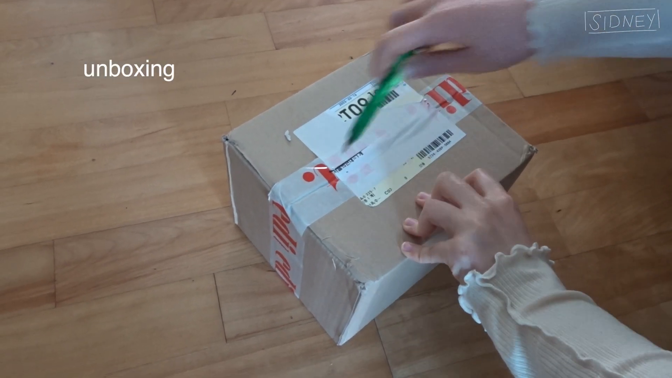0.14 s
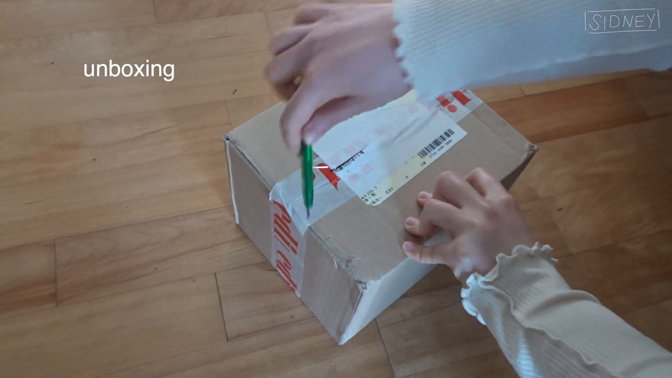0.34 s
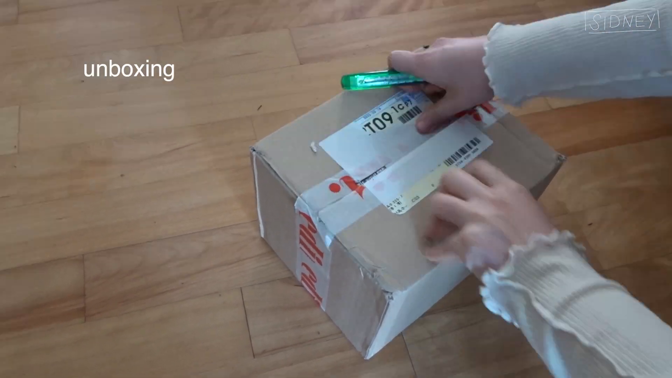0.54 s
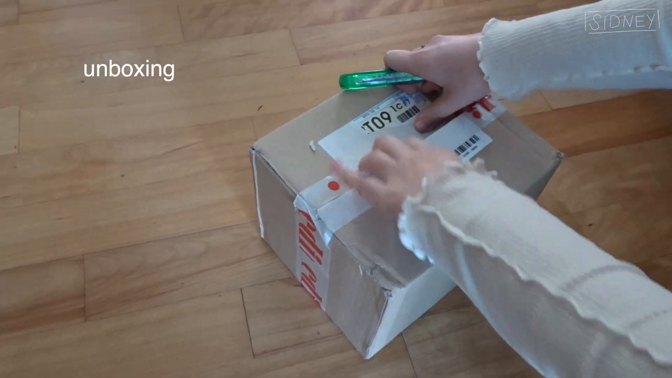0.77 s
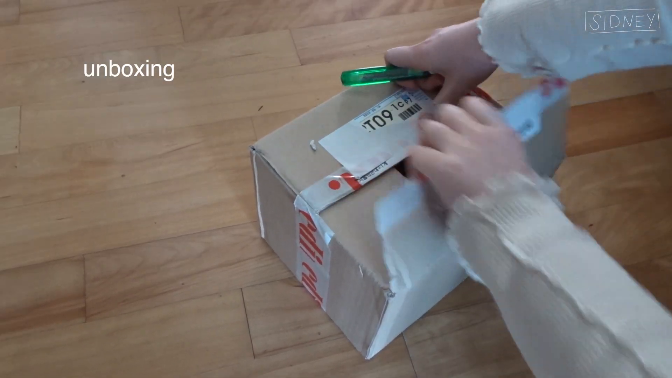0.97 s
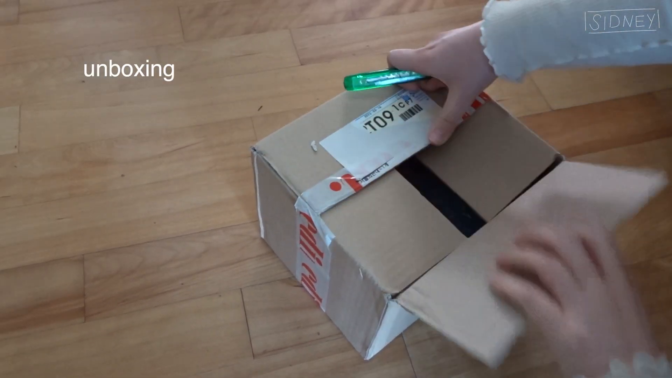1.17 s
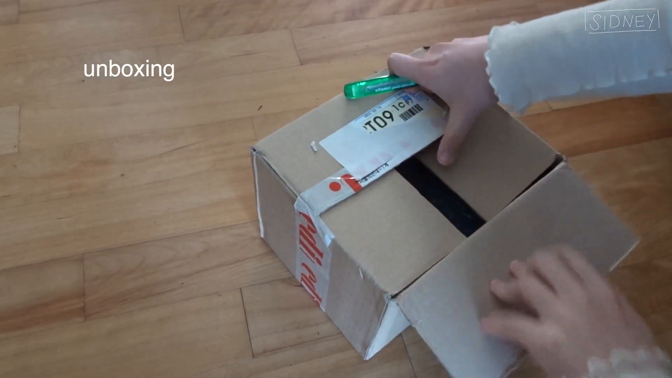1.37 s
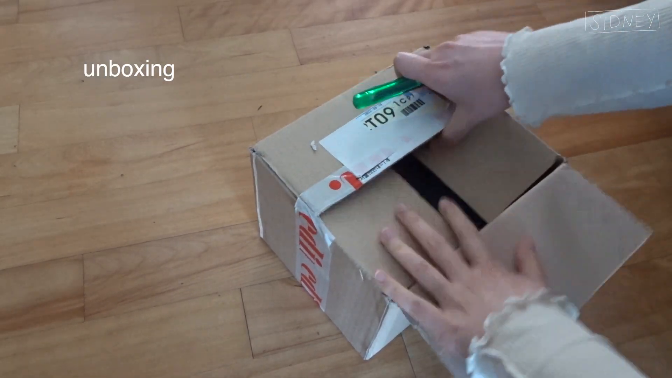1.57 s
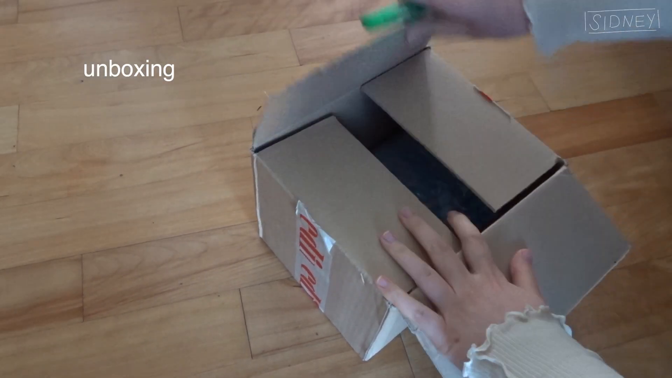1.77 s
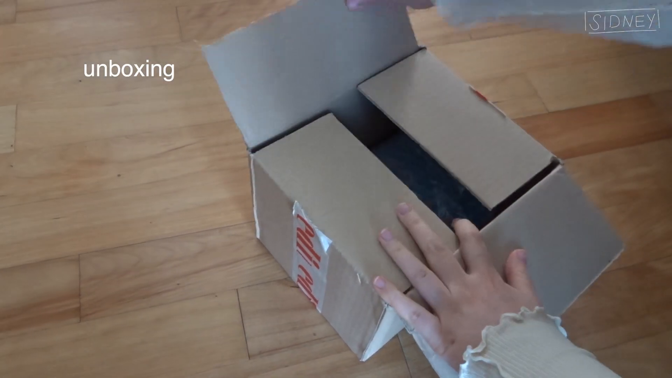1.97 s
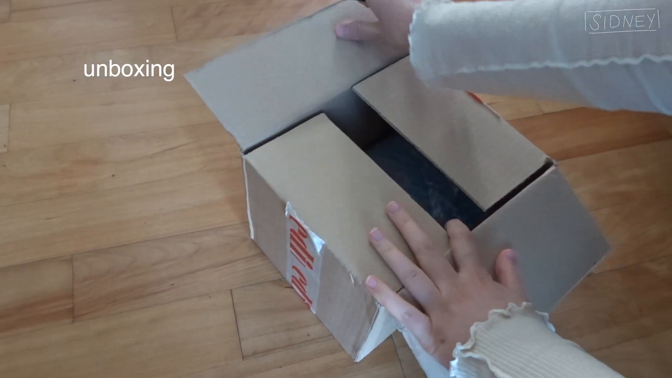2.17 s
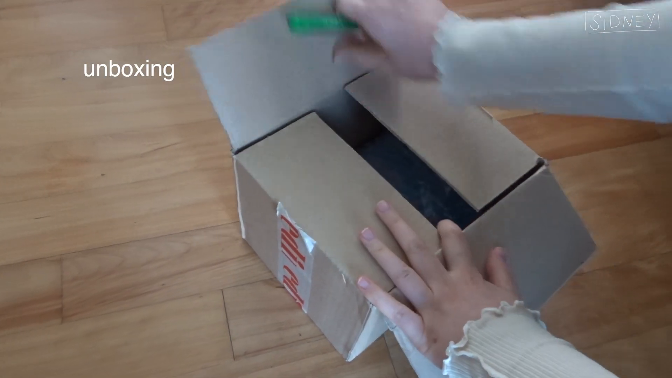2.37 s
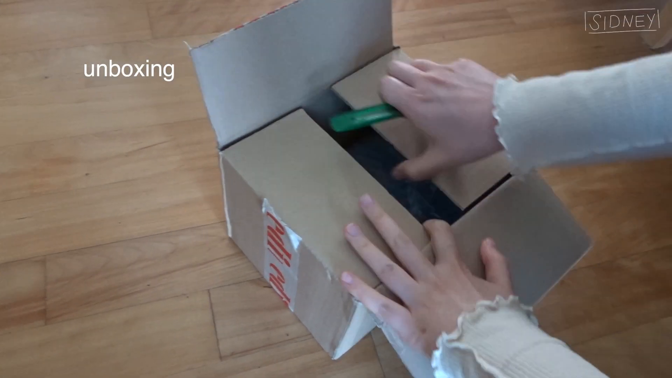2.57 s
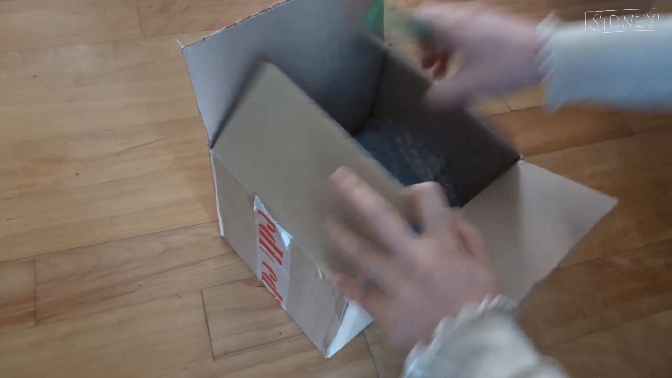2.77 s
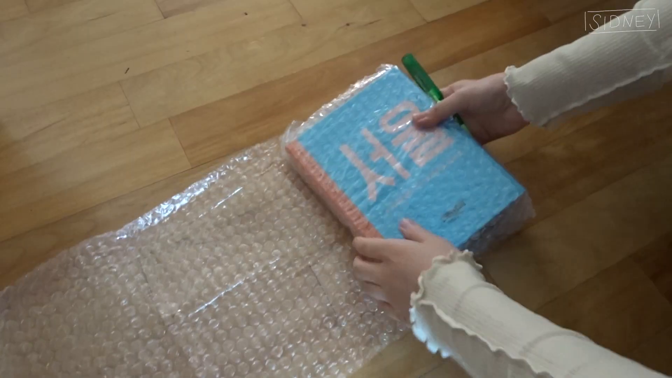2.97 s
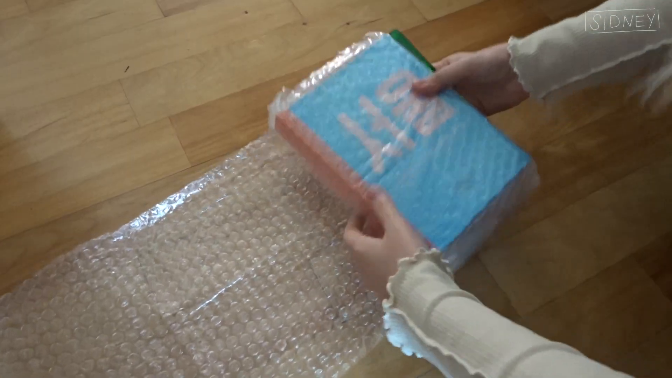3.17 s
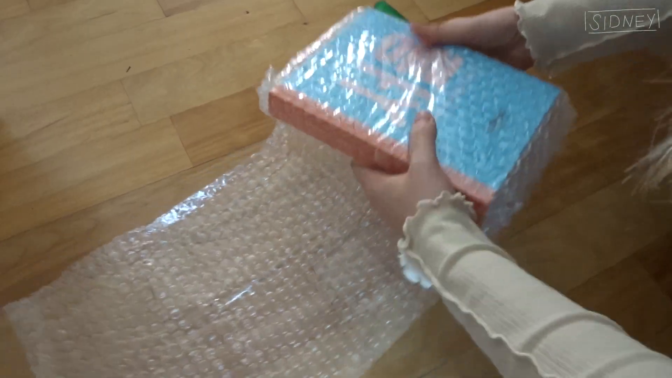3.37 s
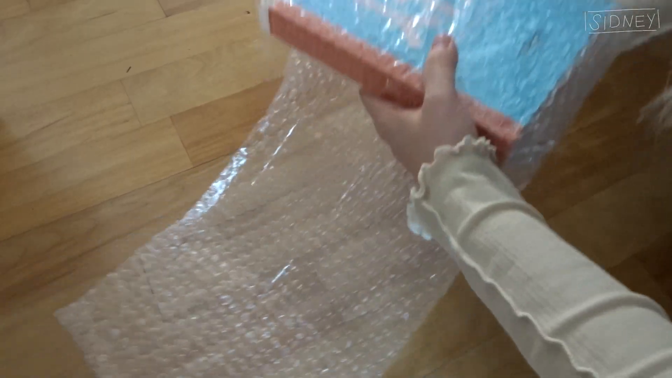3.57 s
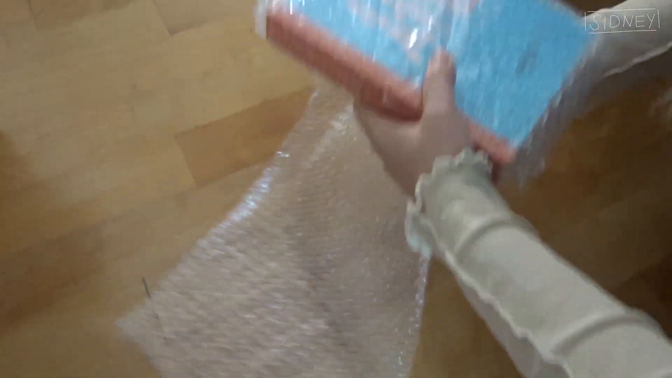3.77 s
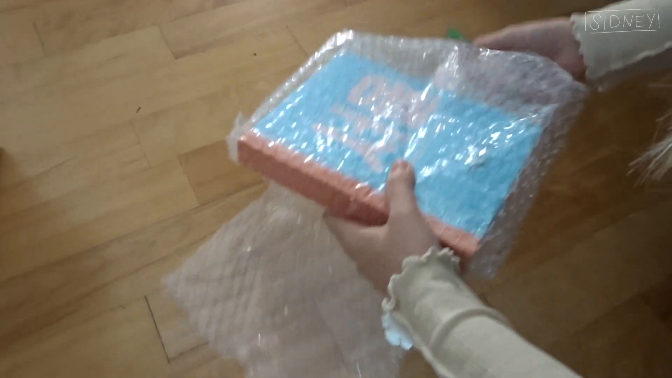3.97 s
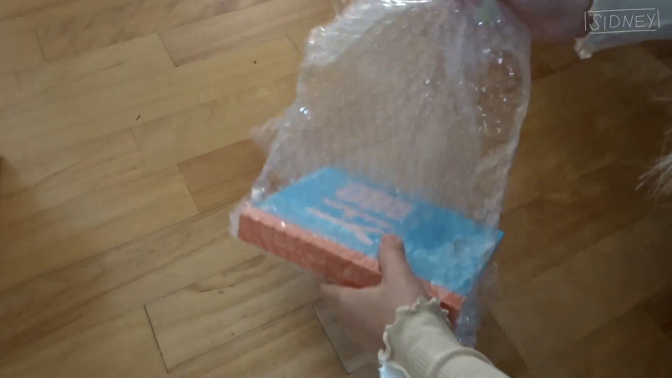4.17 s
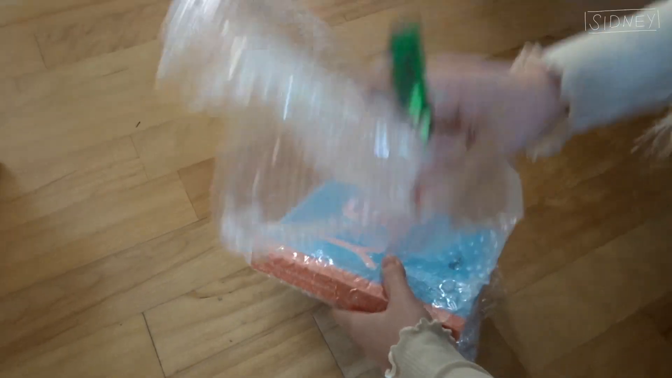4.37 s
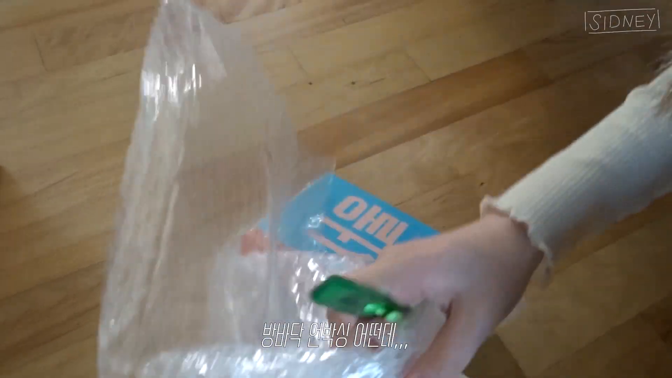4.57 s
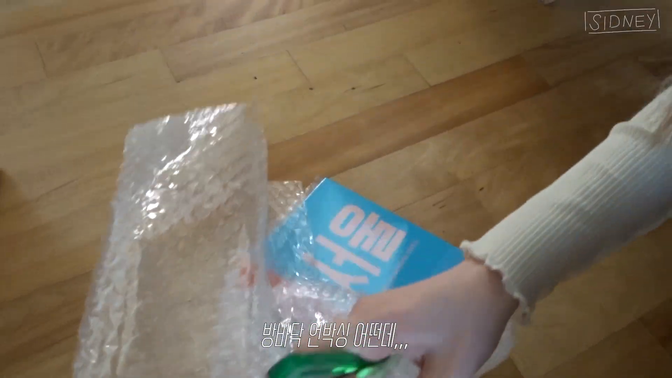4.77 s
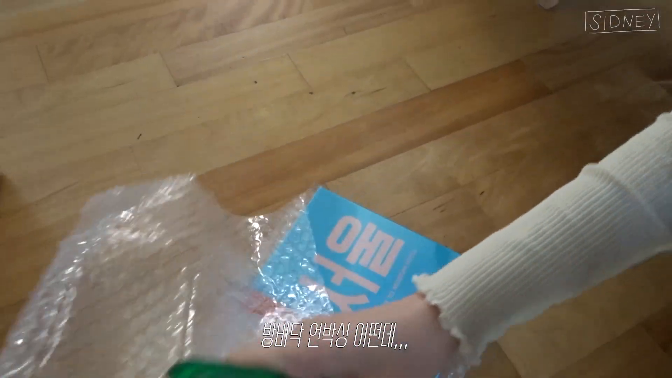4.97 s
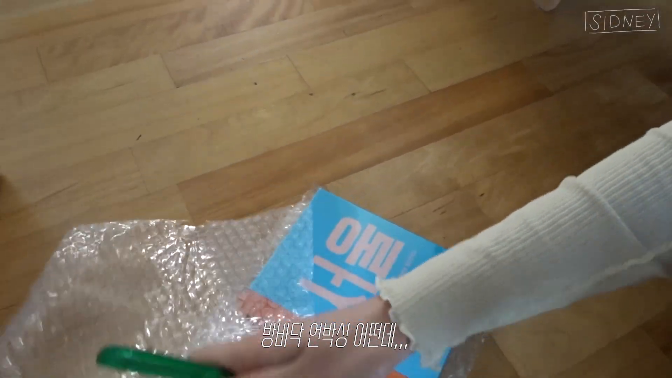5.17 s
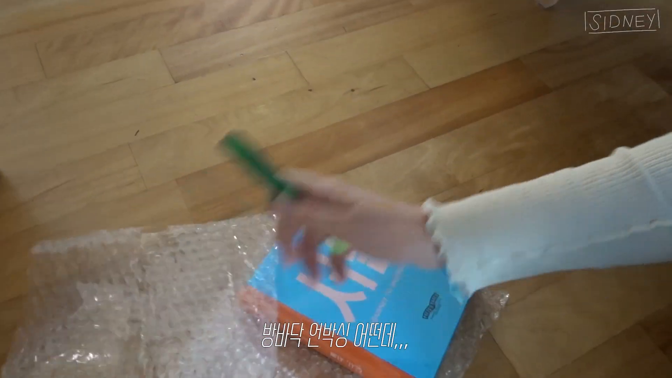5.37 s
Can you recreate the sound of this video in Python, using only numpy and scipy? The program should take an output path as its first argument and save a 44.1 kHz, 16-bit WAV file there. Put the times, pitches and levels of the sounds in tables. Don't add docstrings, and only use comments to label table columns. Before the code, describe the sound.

In a small, fairly dry room, a blade softly scrapes a taped cardboard box, then tape snaps and hollow panel knocks follow. Flaps scrape and briefly creak. Halfway through, bubble wrap takes over with bright, dense crinkling, popping creases and surging rustles, and the contents bump down near the end. Close stereo microphone, little background noise.

```python
import sys
import numpy as np
from scipy import signal
from scipy.fft import rfft, irfft, next_fast_len
from scipy.io import wavfile
from scipy.ndimage import uniform_filter1d

SR = 44100
rng = np.random.default_rng(int(sys.argv[2]) if len(sys.argv) > 2 else 0)


def unload_wav(signal):
    wavfile.write(
        sys.argv[1],
        SR,
        np.round(np.clip(np.atleast_2d(signal).T, -1, 1) * 32767).astype(np.int16),
    )


def level_to_linear(level):
    exponent = np.asarray(level, float) / 20
    return 10 ** exponent


N = 239496
M = next_fast_len(N, True)
HZ = np.fft.rfftfreq(M, 1 / SR)

# (frequency [Hz], width [Hz], level over plain board [dB])
PANEL_MODES = [(176, 27, 23.5), (400, 270, 11.5), (650, 36, 29), (860, 124, 18), (1820, 290, 10),
               (2830, 39, -3), (3620, 710, -1.5)]


def box():
    # (crest time [s], rubbing level [dB], rise [s], fall [s], weight on panels [dB])
    handling = [(0.0, -60.5, .01, 0.099, -8), (0.3, -68.5, 0.57, 0.84, -12.5),
                (0.462, -62, 0.039, 0.041, -17), (0.575, -62.5, 0.053, 0.026, -21),
                (0.5946, -47, 0.00051, 0.067, -2.5), (0.762, -65, .002, 0.15, 12),
                (0.826, -47.5, 0.0093, 0.019, 17.5), (0.85, -53, 0.011, 0.057, 4),
                (0.91, -44, 0.066, 0.048, -7), (1.06, -48.5, 0.11, 0.11, -6.5), (1.2, -53, .03, 0.036, -20),
                (1.25, -61.5, .03, 0.057, -21), (1.305, -51.5, 0.027, 0.039, -12.5),
                (1.38, -62, 0.05, .05, -17), (1.445, -49, 0.016, 0.11, -10),
                (1.475, -49.5, 0.0021, 0.052, 4.5), (1.59, -50, 0.12, 0.059, -4),
                (1.608, -43.5, 0.011, .005, -3), (1.621, -37, 0.0027, 0.0085, 1.5),
                (1.634, -34, 0.0012, 0.0042, 6), (1.646, -34, 0.0042, 0.016, 2.5),
                (1.67, -46.5, 0.018, 0.31, -5), (1.905, -57, 0.0025, 0.06, 9),
                (1.953, -43, 0.0012, 0.015, 1), (1.98, -48, .01, 0.017, -13),
                (2.03, -51.5, 0.059, 0.22, -6.5), (2.19, -57, 0.14, 0.03, -7),
                (2.35, -49, 0.019, 0.039, -4.5), (2.402, -50, 0.0036, 0.013, -10),
                (2.53, -62, 0.13, 0.059, -8), (2.59, -49.5, 0.017, 0.046, -6),
                (2.616, -41, 0.01, 0.01, -19), (2.65, -51, 0.057, 0.055, -11),
                (2.798, -62.5, 0.16, 0.0057, 1)]
    # (frequency [Hz], density [dB per Hz])
    card = [(24, -69), (40, -51), (164, -35.5), (295, -26), (440, -14), (911, -19), (1420, -19),
            (1760, -19), (2500, -13.5), (4950, -7), (11000, 10.5), (14300, -42), (22000, -120)]
    # (level [dB], slope [dB per dB of weight])
    card_follow = [(2.5, 0.85), (3.5, 0.37), (-0.54, -0.42), (-0.5, 0.69)]
    rings = sum(level_to_linear(db) / (1 + ((HZ - hz) / width * 2) ** 2) for hz, width, db in PANEL_MODES)
    colour_db = read(card, HZ) + 11 * np.log10(1 + rings)
    clicks = slips(per_s=7000, spread_db=2.0, clump_db=1.0, clump_s=0.011, smear_s=0.0026)
    clicks = patchy(clicks, patch_db=2.0, frames=14, bins=3)
    return rustle(handling, card_follow, colour_db, clicks)


def wrap():
    # (crest time [s], crinkle level [dB], rise [s], fall [s], sheet flap [dB])
    pulls = [(2.806, -55, 0.0024, 0.24, 1), (3.01, -41.5, .11, 0.015, -17),
             (3.032, -32, 0.0096, 0.028, -4.5), (3.065, -42.5, .02, 0.1, -10.5),
             (3.2, -54, 0.05, 0.089, -7.5), (3.34, -42, 0.12, 0.011, -24), (3.356, -36, 0.0045, 0.12, -22),
             (3.45, -38, 0.057, 0.091, -41), (3.52, -43.5, 0.054, 0.071, -12),
             (3.72, -50.5, 0.57, .012, -17), (3.731, -36, 0.0022, 0.56, -11.5),
             (3.84, -29, 0.055, 0.093, -16.5), (3.93, -32, 0.022, 0.18, -11.5),
             (4.05, -24.5, 0.024, 0.072, -14.5), (4.14, -36.5, 0.15, 0.011, -1.5),
             (4.27, -36.5, 0.045, 0.15, -16), (4.45, -40, 0.36, 0.21, -16),
             (4.575, -34.5, 0.045, 0.32, -10.5), (4.88, -34, 0.061, 0.072, -8.5),
             (5.088, -31.5, 0.052, 0.052, -10.5), (5.268, -27, 0.039, 0.031, -9),
             (5.43, -34.5, 0.13, .1, -7)]
    # (frequency [Hz], density [dB per Hz])
    film = [(40, -70), (120, -68), (300, -26.5), (440, -13), (900, -9.5), (1600, -5), (2300, -5.5),
            (3200, -3), (4500, -7), (7000, -9.5), (11000, -12)]
    # (level [dB], slope [dB per dB of flap])
    film_follow = [(0.12, 0.84), (0.41, 0.86), (0.078, 0.011), (5.64, 0.021)]
    clicks = slips(per_s=8000, spread_db=2.2, clump_db=0.8, clump_s=.003, smear_s=.0014)
    clicks = patchy(clicks, patch_db=2.0, frames=5, bins=6)
    return rustle(pulls, film_follow, read(film, HZ), clicks)


def rustle(moves, follow, colour_db, clicks):
    splits_hz = (1200, 2200, 5000)
    surge_share = (1.5, 0.74, 1.22, 0.67)
    s, level_db, rise_s, fall_s, weight_db = np.transpose(moves)
    under = [0 * HZ]
    under += [1 / np.sqrt(1 + (HZ / f) ** 8) for f in splits_hz]
    under += [1 + 0 * HZ]
    near, other = rfft(clicks, M) * level_to_linear(colour_db)
    out, surge = np.zeros((2, N)), surges()
    for k, (rel_db, slope) in enumerate(follow):
        share = np.sqrt(under[k + 1] ** 2 - under[k] ** 2)
        level = swells(s, level_db + rel_db + slope * weight_db, rise_s, fall_s)
        out += level * surge ** surge_share[k] * evened(ports(near * share, other * share))
    return out


def slips(per_s, spread_db, clump_db, clump_s, smear_s):
    size = level_to_linear(spread_db * np.minimum(rng.exponential(1, (2, N)), 5)) * rng.standard_normal((2, N))
    bursts = rng.standard_normal(N) ** 3
    clumps = evened(signal.lfilter([1], [1, -np.exp(-1 / (clump_s * SR))], bursts))
    clicks = size * (rng.random((2, N)) < per_s / SR) * level_to_linear(clump_db * clumps)
    t = np.arange(1024) / SR
    scatter = rng.standard_normal((2, len(t))) * np.exp(-t / smear_s)
    scatter[:, 0] = 3.93
    spread = rfft(scatter, M)
    return irfft(rfft(clicks, M) * spread / abs(spread), M)[:, :N]


def patchy(x, patch_db, frames, bins):
    hz, _, z = signal.stft(x, SR, nperseg=256)
    field = uniform_filter1d(rng.standard_normal(z.shape[1:]), round(bins), 0)
    field = uniform_filter1d(field, round(frames), 1)
    depth_db = patch_db / np.sqrt(1 + (hz[:, None] / 4500) ** 2)
    return signal.istft(z * level_to_linear(depth_db * evened(field)), nperseg=256)[1][:, :N]


def surges():
    # (crest time [s], extra level [dB], decay [s])
    cascades = [(0.465, 12, 0.00093), (1.126, 7, 0.0096), (1.734, 6, 0.0027), (1.748, 10, 0.0029),
                (1.938, 9.5, 0.0097), (2.943, 5, 0.02), (2.978, 5, 0.0064), (3.335, 6, 0.0018),
                (3.361, 5, 0.006), (3.497, 8.5, 0.0095), (3.529, 8.5, 0.0063), (3.807, 2.5, 0.015),
                (3.829, 2, 0.006), (3.848, 4, 0.009), (3.967, 6, 0.019), (4.002, 5, .004),
                (4.056, 2.5, 0.0061), (4.093, 1.5, 0.01), (4.872, 6.5, 0.017), (4.922, 5.5, 0.0059),
                (5.05, 4, 0.028), (5.24, 0.5, .01), (5.268, -3, 0.0029)]
    t, extra = np.arange(N) / SR, np.ones(N)
    for s, db, decay_s in cascades:
        at = slice(round((s - .02) * SR), round((s + .08) * SR))
        u = (t[at] - s) / decay_s
        extra[at] += (level_to_linear(db) - 1) * np.exp(-np.maximum(u, -2.5 * u))
    return extra


def swells(s, db, rise_s, fall_s):
    step = 48
    late = np.arange(0, N + step, step) / SR - np.asarray(s)[:, None]
    shape = np.exp(-np.maximum(late / abs(fall_s)[:, None], -late / abs(rise_s)[:, None]))
    level = np.sqrt(((level_to_linear(db)[:, None] * shape) ** 2).sum(0))
    return np.interp(np.arange(N) / step, np.arange(len(level)), level)


def tape_snaps():
    # (time [s], peak
    # level [dB], pitch [Hz])
    tape_cracks = [(0.4632, -45, 6310), (0.5945, -33, 6500), (0.762, -47, 3310), (0.7875, -43, 9290),
                   (0.8163, -33, 2230), (0.8267, -24, 5300), (0.8301, -30, 3570), (0.8338, -30, 5250),
                   (1.1213, -35, 5230), (1.3168, -43, 3920), (1.4743, -27, 2260), (1.4779, -34, 1920),
                   (1.6195, -29, 2460), (1.622, -28, 3770), (1.6331, -26, 5200), (1.6452, -14, 4120),
                   (1.648, -15, 4820), (1.6546, -25, 3090), (1.7344, -35, 2490), (1.7489, -34, 3110),
                   (1.8185, -38, 2130), (1.9045, -37, 5590), (1.9528, -21, 1850), (1.9564, -31, 2200),
                   (2.5005, -50, 8300), (2.4009, -47, 3560), (2.6131, -34, 4540), (2.6186, -39, 3910),
                   (0.4485, -53, 9500), (0.5572, -55, 4030), (0.5819, -53, 3280), (0.5982, -41, 3370),
                   (0.6193, -41, 2930), (0.6369, -43, 2420), (0.6653, -48, 2520), (0.6943, -46, 9300),
                   (0.879, -36, 3130), (1.0592, -40, 3310), (1.0911, -44, 7160), (1.2736, -45, 4120),
                   (1.4303, -50, 3390), (1.6087, -35, 1920), (1.6885, -31, 3390), (1.7327, -34, 5430),
                   (1.7517, -38, 2530), (1.7655, -36, 2540), (1.8105, -39, 2600), (1.8161, -44, 3050),
                   (1.8214, -40, 1960), (1.8575, -47, 4110), (1.9114, -41, 1980), (1.9342, -40, 2860),
                   (1.937, -38, 1810), (2.0812, -42, 3020), (2.218, -49, 3510), (2.5533, -50, 3820),
                   (2.5857, -46, 4410), (2.6222, -40, 4450)]
    return level_to_linear(7) * panels(snaps(tape_cracks, tick_db=1, debris_db=-12, debris_s=.0025))


def film_snaps():
    # (time [s], peak level [dB], pitch [Hz])
    film_cracks = [(2.8078, -37, 2770), (2.8431, -41, 3970), (2.9795, -32, 4750), (2.9927, -27, 5760),
                   (3.0009, -32, 5120), (3.0283, -16, 3300), (3.0322, -15, 2600), (3.0445, -14, 6500),
                   (3.1305, -35, 4810), (3.1459, -33, 6090), (3.2402, -38, 3600), (3.2897, -34, 3310),
                   (3.324, -28, 5380), (3.3334, -29, 4810), (3.3599, -28, 3800), (3.3889, -28, 4470),
                   (3.3947, -23, 7400), (3.4069, -27, 5040), (3.4283, -22, 6760), (3.4321, -16, 5560),
                   (3.4353, -26, 5620), (3.4978, -27, 3440), (3.5299, -26, 3680), (3.5544, -32, 5610),
                   (3.6885, -37, 4080),
                   (3.8485, -19, 4280), (3.852, -17, 5600), (3.9714, -21, 3760), (4.0553, -19, 4410),
                     (4.0917, -16, 5600), (4.2754, -23, 6800), (4.3345, -27, 4200), (4.3375, -26, 5940),
                     (4.4416, -29, 6910), (4.4919, -28, 4690), (4.4993, -28, 3810), (4.5751, -25, 5210),
                     (4.7694, -27, 3980), (4.8749, -20, 2720)]
    # (time [s], peak level [dB], pitch
    # [Hz])
    film_ticks = [(2.9518, -34, 4910), (3.1916, -37, 4990), (3.2122, -39, 5620), (3.2188, -38, 6000),
                  (3.3153, -35, 4770), (3.3317, -31, 4700), (3.3552, -28, 5320), (3.4223, -27, 5820),
                  (3.4759, -30, 5540), (3.5345, -27, 4640), (3.6054, -39, 3610), (3.6266, -38, 4110),
                  (3.6304, -38, 4460), (3.6914, -38, 7400),
                  (3.8088, -21, 7860), (3.8284, -21, 3110), (3.8313, -20, 3690), (3.9007, -24, 3680),
                  (4.0032, -21, 3110), (4.0804, -20, 6110), (4.1482, -26, 3950), (4.1891, -29, 4820),
                  (4.237, -26, 7410), (4.2399, -26, 6790), (4.2454, -26, 5420), (4.2605, -29, 4370),
                  (4.2805, -28, 4980), (4.3207, -27, 5660), (4.3473, -27, 4900), (4.3598, -30, 4600),
                  (4.3855, -30, 4590), (4.3942, -28, 5630), (4.4144, -30, 5890), (4.4179, -31, 6100),
                  (4.4316, -30, 3720), (4.4347, -29, 5080), (4.4856, -32, 4560), (4.5054, -29, 4680),
                  (4.5302, -29, 3980), (4.5787, -25, 3980), (4.6099, -27, 3560), (4.6288, -25, 3530),
                  (4.7399, -28, 4480), (4.7934, -31, 3970), (4.9809, -34, 3400), (5.0013, -33, 4950),
                  (5.004, -33, 5350), (5.0099, -34, 3760), (5.0333, -29, 5370), (5.0498, -26, 3860),
                  (5.0827, -23, 4150), (5.0908, -22, 4690), (5.1594, -34, 4440), (5.1786, -36, 4000),
                  (5.2576, -20, 4990), (5.2687, -17, 5030), (5.2741, -20, 4030), (5.3061, -26, 4400),
                  (5.3092, -26, 4260), (5.3144, -28, 4350)]
    crisp = level_to_linear(7.5) * snaps(film_cracks, tick_db=8, debris_db=-22, debris_s=.002)
    sprayed = level_to_linear(7.2) * snaps(film_ticks, tick_db=1, debris_db=-14, debris_s=.0015)
    return -crisp - sprayed


def snaps(rows, tick_db, debris_db, debris_s):
    out = np.zeros((2, N))
    t = np.arange(1500) / SR
    for (s, db, hz), noise in zip(rows, rng.standard_normal((len(rows), 3, len(t)))):
        wide = 0.57 * (hz / 4030) ** -0.12
        sound, peak_s = ring(hz, .15 / (wide * hz))
        debris = (noise[0] + 2.0 * noise[1:]) * np.exp(-t / debris_s)
        spray = signal.oaconvolve(debris, sound[None] / np.linalg.norm(sound))
        one = np.zeros((2, 2 * len(t)))
        add(one, 0, level_to_linear(0.5) * sound)
        add(one, peak_s, level_to_linear(tick_db) * np.array([1., -.5]))
        add(one, .0007, level_to_linear(-8) * sound)
        add(one, peak_s, level_to_linear(debris_db) * spray)
        add(out, s - peak_s, level_to_linear(db) * above(one, max(600, 0.38 * hz)))
    return out


def ring(hz, life_s):
    u = np.arange(round(9 * life_s * SR) + 8) / SR / life_s
    return u * np.exp(1 - u) * np.cos(2 * np.pi * hz * life_s * (u - 1)), life_s


def panels(x):
    t = np.arange(3000) / SR
    ringing = sum(level_to_linear(db) * width * np.exp(-np.pi * width * t) * np.sin(2 * np.pi * hz * t)
                  for hz, width, db in PANEL_MODES)
    return x + level_to_linear(-5.0) * signal.oaconvolve(x.mean(0), ringing / SR * 2 * np.pi)[:N]


def knocks():
    # (time [s], peak level [dB], pitch [Hz])
    blows = [(0.5958, -38, 820), (1.475, -18.5, 530), (0.6011, -32, 770), (0.6174, -33.5, 830),
             (0.7623, -42, 610), (0.8115, -34, 597), (0.8196, -20.5, 426), (0.8351, -28, 520),
             (0.8536, -28, 505), (1.1312, -37.5, 536), (1.4794, -21, 440), (1.4885, -26, 650),
             (1.6094, -29, 780), (1.6357, -28, 774), (1.6471, -18.5, 820), (1.6693, -23.5, 477),
             (1.7514, -31.5, 930), (1.7698, -33.5, 594), (1.9091, -39, 650), (1.9636, -25, 660),
             (2.0668, -42, 790), (1.938, -29, 820), (2.6222, -32, 860), (2.8084, -40, 630),
             (0.6373, -38, 754), (2.9805, -35.5, 890), (3.0335, -21.5, 1000), (3.0455, -20.5, 894),
             (4.875, -25, 614)]
    out = np.zeros(N)
    for s, db, hz in blows:
        sound, peak_s = ring(hz, 1.09 / hz)
        add(out, s - peak_s, level_to_linear(db) * sound)
    return above(out, 300)


def thuds():
    # (time [s], peak level [dB], pitch [Hz], decay by 60 dB [s])
    booms = [
        (0.599, -65, 164, 0.11),
        (0.814, -65, 152, 0.39),
        (1.131, -67, 107, 0.25),
        (1.474, -55.5, 166, 0.44),
        (1.645, -47, 168, 0.37),
        (1.949, -48, 176, 0.14),
        (2.807, -70, 121, 0.059),
        (4.87, -45, 161, 0.15),
        (4.924, -55.5, 151, 0.13),
        (4.982, -60, 153, 0.14),
    ]
    out, t = np.zeros(N), np.arange(SR // 2) / SR
    for (s, db, hz, t60), noise in zip(booms, rng.standard_normal((len(booms), len(t)))):
        rumble = evened(resonate(resonate(noise, hz, 80), hz, 80))
        push = 0.55 * t / 0.0022 * np.exp(1 - t / 0.0014) * np.cos(2 * np.pi * 60.0 * t)
        swing = 1.04 * np.sin(2 * np.pi * hz * t) + 1.7 * rumble
        decay = level_to_linear(-60 * t / t60) * (1 - np.exp(-t / 0.00079))
        add(out, s, level_to_linear(db) * (push + decay * swing))
    return out


def creak():
    # (crest time [s], level [dB], fall [s], panel pitch [Hz], relative octave level [dB])
    groans = [(0.905, -50, 0.011, 930, 12.5), (1.975, -43, 0.023, 878, -17), (2.072, -44, 0.027, 790, -10),
              (2.18, -52.5, 0.073, 854, -2), (2.29, -56.5, .03, 860, 2), (2.339, -39.5, 0.013, 844, 6),
              (2.355, -35.5, 0.0076, 860, -3), (2.617, -32, 0.0077, 893, -26),
              (2.827, -48.5, 0.015, 610, -14), (2.885, -49.5, 0.019, 602, -12),
              (4.311, -45.5, .014, 385, -3), (4.615, -53, 0.016, 388, -18)]
    s, db, fall_s, hz, octave_db = np.transpose(groans)
    hz, slip = np.interp(np.arange(N) / SR, s, hz), rng.standard_normal((2, N))
    low = evened(resonate(resonate(slip[0], hz, 72), hz, 78))
    high = evened(resonate(resonate(slip[1], 2.02 * hz, 270), 1.85 * hz, 260))
    rise_s = fall_s
    return swells(s, db, rise_s, fall_s) * low + swells(s, db + octave_db, rise_s, fall_s) * high


def resonate(x, hz, width):
    turn = np.exp(2j * np.pi * np.cumsum(hz * np.ones(len(x))) / SR)
    r = np.exp(-np.pi * width / SR)
    return 2 * (turn * signal.lfilter([1 - r], [1, -r], x / turn)).real


def squeak():
    # (time [s], pitch [Hz], level [dB])
    notes_sung = [
        [(1.015, 2490, -60), (1.05, 2700, -59), (1.092, 2800, -70), (1.118, 2920, -56), (1.158, 3000, -61),
         (1.185, 3080, -73)],
        [(1.178, 3990, -61), (1.197, 4030, -59), (1.207, 4110, -68), (1.228, 4220, -61), (1.268, 4000, -61),
         (1.32, 4120, -57), (1.37, 4320, -63), (1.43, 4200, -61), (1.475, 3760, -61)],
    ]
    out = np.zeros(N)
    for rows in notes_sung:
        s, hz, db = np.transpose(rows)
        t = np.arange(s[0], s[-1], 1 / SR)
        waver, flutter = evened(uniform_filter1d(rng.standard_normal((2, len(t))), 300))
        turns = np.cumsum(np.interp(t, s, hz) * (1 + 0.003 * waver)) / SR
        level = level_to_linear(np.interp(t, s, db) + 11.0 + 1.2 * flutter) * signal.windows.tukey(len(t), .07)
        add(out, s[0], level * np.sin(2 * np.pi * turns))
    return out


def pips():
    # (time [s], peak level [dB], pitch [Hz], ring time [ms])
    edge_rings = [(0.7875, -39, 9700, 0.39), (0.8173, -24, 607, 0.81), (0.8262, -19.5, 3240, 0.43),
                  (1.4746, -34, 2830, 0.98), (1.952, -24, 5400, 0.12), (1.9545, -26, 930, 2.0),
                  (1.9535, -29, 2190, 1.1), (2.1025, -44, 3150, .7), (2.1245, -53, 3190, 0.78),
                  (2.1471, -42.5, 3170, .7), (2.808, -44, 1870, 1.3), (4.877, -37.5, 1356, 3.3),
                  (2.402, -46, 1620, 0.99), (4.8749, -21, 1820, 0.96), (4.8751, -18.5, 3430, 0.42)]
    out = np.zeros(N)
    for s, db, hz, life_ms in edge_rings:
        sound, peak_s = ring(hz, life_ms / 1000)
        add(out, s - peak_s, level_to_linear(db + 7) * sound)
    return above(out, 320)


def above(x, hz):
    return signal.sosfilt(signal.butter(4, hz, "high", fs=SR, output="sos"), x)


def sway():
    # (time [s], left-right level [dB])
    places = [
        (0.5, 0),
        (1.25, -2),
        (2.2, 0),
        (3.2, 0),
        (3.9, -1),
        (4.6, -0.2),
        (5.3, 0.5),
    ]
    pan_db = np.interp(np.arange(N) / SR, *np.transpose(places))
    return level_to_linear(np.array([pan_db, -pan_db]) / 2)


def ports(near, other):
    # (frequency [Hz], left-right likeness [0-1])
    likeness = [(60, 0.97), (170, 0.97), (490, 0.92), (1410, 0.86), (4030, 0.64), (11500, 0.34)]
    # (frequency [Hz], phase by which left leads [rad])
    lead = [(0, 0), (600, 0.28), (1300, 0.52), (2330, 0.77), (4050, -0.93), (9130, -1.67), (11200, -0.2),
            (11700, -2.6)]
    # (frequency [Hz], left-right level [dB])
    tilt = [(60, 2), (170, 0), (490, 0.5), (1410, 0), (4030, -2), (10800, 1), (11500, 0.5)]
    same = np.clip(read(likeness, HZ), 0, 1)
    half = level_to_linear(read(tilt, HZ) / 2) * np.exp(.5j * read(lead, HZ))
    left = near * half
    right = (same * near + np.sqrt(1 - same ** 2) * other) / half
    return irfft(np.array([left, right]), M)[:, :N]


def room(x):
    # (frequency [Hz], decay by 60 dB [s])
    decay = [(150, 0.066), (600, 0.21), (2500, 0.24), (9000, 0.064)]
    taps = np.zeros((2, SR // 2))
    slots = np.arange(90, SR // 2 - 20, 20)
    at = slots + rng.integers(0, 20, (2, len(slots)))
    np.put_along_axis(taps, at, rng.choice([-1., 1.], at.shape), 1)
    hz, t, z = signal.stft(taps, SR, nperseg=256)
    tail = signal.istft(z * level_to_linear(-60 * t / read(decay, hz)[:, None]), SR, nperseg=256)[1]
    return ports(*(rfft(x, M) * rfft(tail / np.linalg.norm(tail[0]), M)))


def air():
    # (frequency [Hz], density [dB per Hz])
    hum = [(30, -1), (100, 4), (170, 13.5), (300, 3), (600, -6), (2000, -46)]
    # (crest time [s], level [dB], rise [s], fall [s])
    puffs = [(2.9, -82, .05, .05), (3.03, -84, .01, 0.027), (3.2, -86, .05, .05), (3.33, -88, 0.071, .03),
             (3.41, -78, .02, 0.016), (3.76, -75.5, 0.034, .1), (3.98, -74, .03, 0.052),
             (4.23, -77, .02, 0.027), (4.41, -85, .015, 0.027), (4.62, -79, 0.019, .1),
             (4.81, -75, .02, .03), (5.129, -80, 0.018, .1), (5.42, -80, 0.022, .02)]
    level = level_to_linear(-88) * (np.arange(N) < 2.8 * SR) + swells(*np.transpose(puffs))
    return level * evened(ports(*rfft(rng.standard_normal((2, M))) * level_to_linear(read(hum, HZ))))


def evened(x):
    return x / np.sqrt(np.mean(x ** 2) + 1e-20)


def read(points, hz):
    f, value = np.transpose(points)
    return np.interp(np.log(hz + 1), np.log(f + 1), value)


def add(mix, s, sound):
    part = mix[..., round(s * SR):][..., :sound.shape[-1]]
    part += sound[..., :part.shape[-1]]


def scene():
    single = (tape_snaps() + film_snaps()) * level_to_linear([[-.7], [.7]])
    single = single + knocks() + thuds() + squeak() + pips() + creak()
    return single + level_to_linear(-10.0) * room(single.mean(0)) + (box() + wrap()) * sway() + air()


def shut_bass(x):
    # (time [s], depth [dB], half length [s])
    dips = [
        (3.15, 6, .03),
        (3.495, 16, 0.021),
        (3.593, 26, 0.062),
        (4.148, 10, .02),
        (4.355, 14, 0.044),
        (4.533, 20, 0.05),
        (4.773, 10, .015),
        (5.2, 14, 0.028),
    ]
    t = np.arange(N) / SR
    dip_db = sum(db * np.exp(-((t - s) / half_s) ** 4) for s, db, half_s in dips)
    low = irfft(rfft(x, M) / (1 + (HZ / 310) ** 12), M)[:, :N]
    return x - low * (1 - level_to_linear(-dip_db))


def roll_off(x):
    return signal.sosfilt(signal.butter(12, 12130, fs=SR, output="sos"), x)


def record(dry):
    # (frequency [Hz], gain [dB])
    edge = [(10950, -7), (11150, -38), (11500, -50), (12200, -56), (13000, -76)]
    mix = irfft(rfft(shut_bass(dry), M) * level_to_linear(read(edge, HZ)), M)[:, :N]
    return roll_off(mix)


dry = scene()
out = record(dry)
unload_wav(out)
```